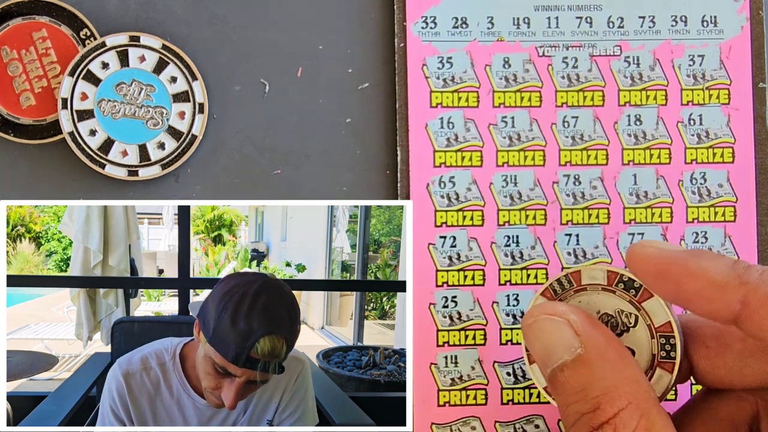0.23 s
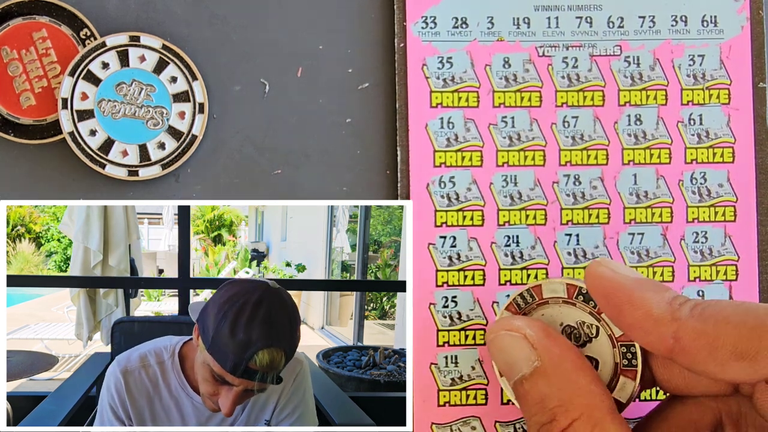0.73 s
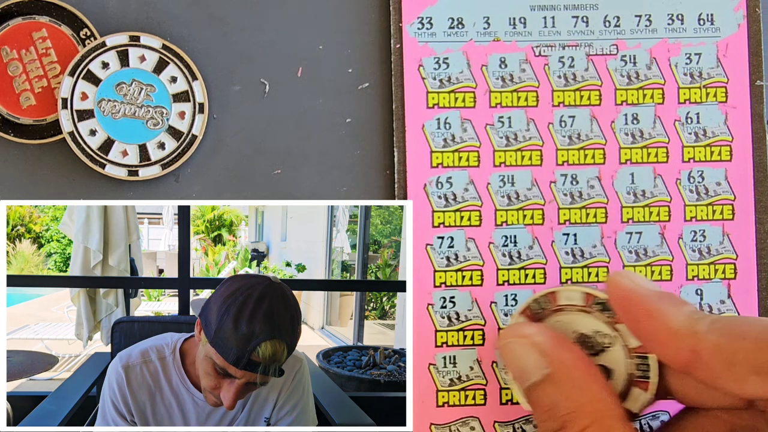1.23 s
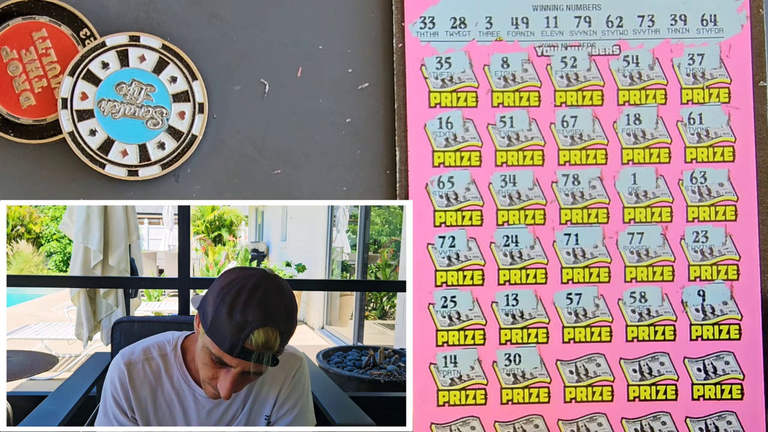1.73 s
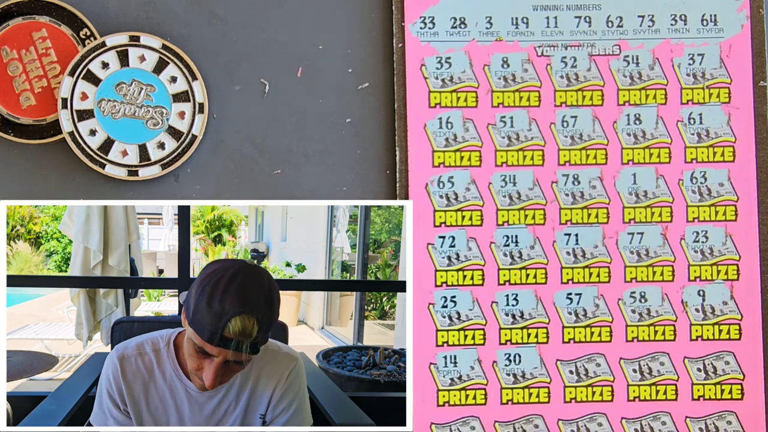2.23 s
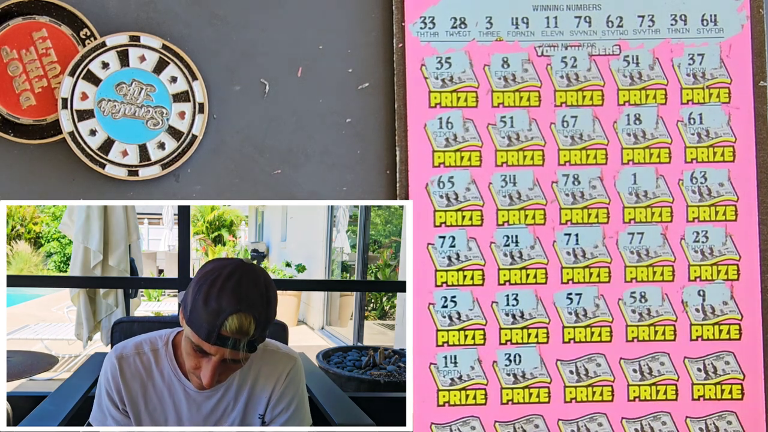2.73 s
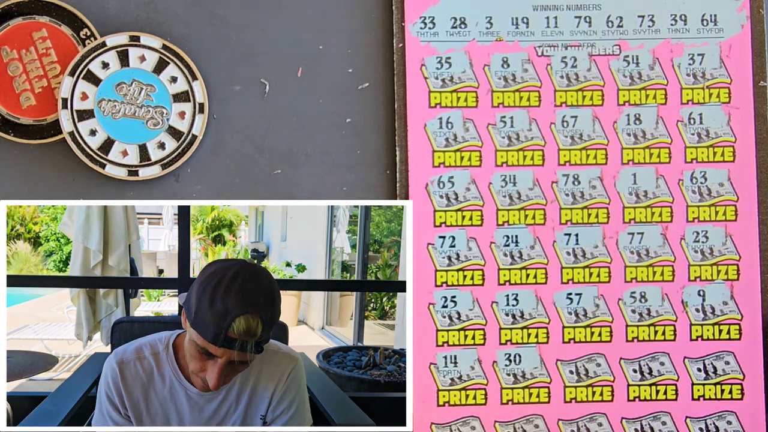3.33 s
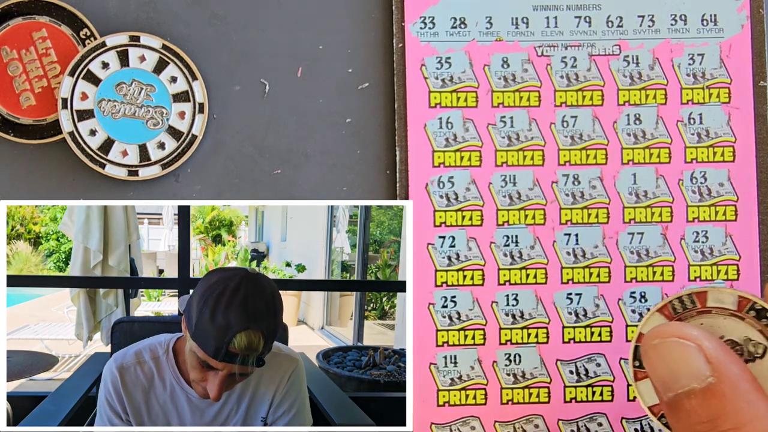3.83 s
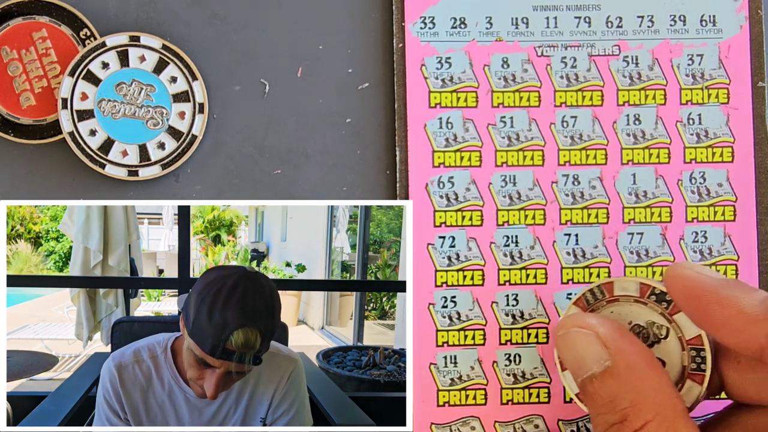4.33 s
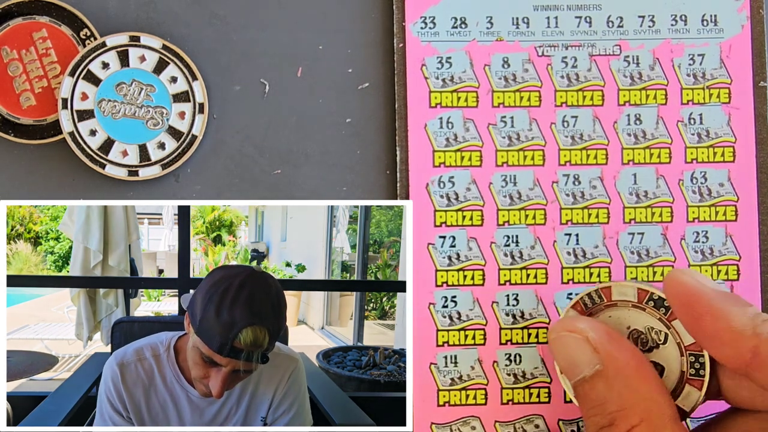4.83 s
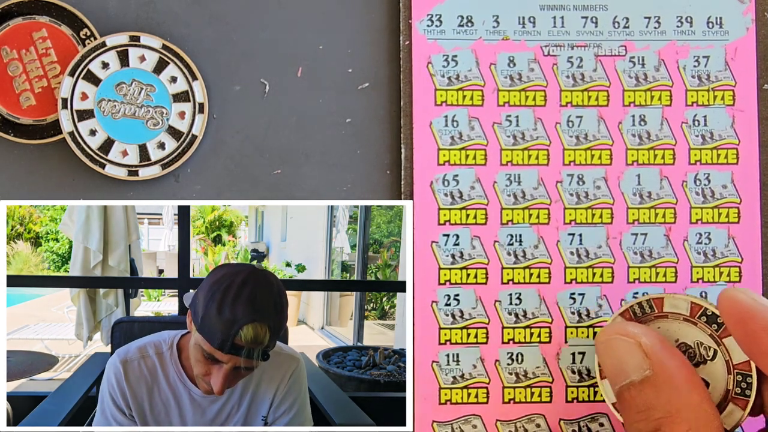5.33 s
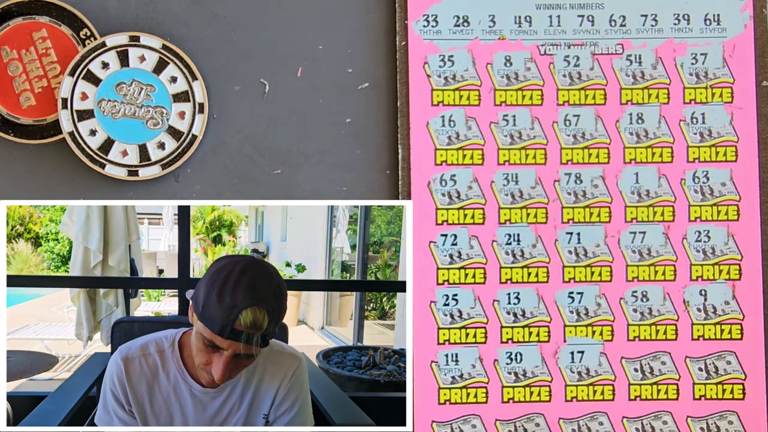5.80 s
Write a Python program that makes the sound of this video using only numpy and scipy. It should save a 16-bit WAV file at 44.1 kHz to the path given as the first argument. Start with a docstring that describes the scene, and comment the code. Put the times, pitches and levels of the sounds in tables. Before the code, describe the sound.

Short dry scratches of a coin rubbing a ticket on a table, with soft knocks, a quiet pause between bouts and faint insect buzz behind.

```python
"""Coin on a scratch ticket

A large coin scrapes latex off a ticket lying on a table, in two bouts of quick to-and-fro strokes.
Grains of tearing latex excite coin and card resonances and a broad hiss; filtered clicks make the knocks.
The rim squeaks hoarsely, snaps free in short cracks and judders against the table on the return strokes.
Behind it lie shaped-noise rumble, a faint sine hum and a high pulsing buzz like an insect in the garden."""
import sys
import numpy as np
from scipy import signal
from scipy.fft import rfft, irfft
from scipy.io import wavfile
from scipy.ndimage import uniform_filter1d

SR = 44100
rng = np.random.default_rng(int(sys.argv[2]) if len(sys.argv) > 2 else 0)


def dump_mix(stems):
    """Bounce the given channels to the path in sys.argv[1] as a 16-bit WAV at rate SR."""
    frames = np.atleast_2d(stems).T  # one column per channel
    limited = np.clip(frames, -1, 1)  # hard clip at full scale
    pcm = np.round(limited * 32767).astype(np.int16)
    wavfile.write(sys.argv[1], SR, pcm)


N = 267334
TIME = np.arange(N) / SR

# the coin's lowest tone, which sings along when it is held loosely, and its first overtone
RING_HZ, RING_WIDTH_HZ, RING_PAN_DB, OVERTONE_HZ = 1321, 22, 9, 1961
# still background spectrum: pitch_hz, relative_db (per Hz)
AIR_SPECTRUM = [(15, -10.5), (28, 1), (85, 0.5), (130, -5), (180, -13), (235, -11.5), (275, -17.5),
                (365, -24), (410, -21.5), (441, -27), (468, -22.5), (700, -28.5), (1150, -29.5),
                (1350, -30), (2050, -36), (2500, -42), (4000, -46.5), (6000, -57), (15000, -64.5)]
AIR_DB = -43.5
# stereo likeness of the background: pitch_hz, left_right_correlation (-1..1)
AIR_LIKENESS = [(60, 0.99), (130, 1), (290, 0.74), (640, 0.48), (1300, -0.25), (3000, 0.032),
                (15000, -0.049)]
# tones of the distant motor, before their wavering: pitch_hz, level_db
HUM_TONES = [(41, -56.5), (59.3, -54), (120, -67), (177, -70.5), (240, -57.5), (295, -70.5)]
# insect buzz spectrum: pitch_hz, relative_db (per Hz)
INSECT_SPECTRUM = [(5000, -25), (6500, -16.5), (7250, -0.5), (7900, -3.5), (8500, -4), (9400, -8),
                   (10100, -18), (13000, -43)]
# wander of the insect's beat and loudness: time_s, lateness_s, level_db
INSECT_COURSE = [(0, -0.0046, -71), (2, -0.013, -70.5), (2.5, -0.0022, -70), (3, -0.0048, -71),
                 (3.6, 0.014, -70.5), (4.2, .012, -68.5), (5.8, 0.0004, -70.5)]
CHIRPS_PER_S, FIRST_CHIRP_S, CHIRP_SQUARENESS = 8.185, .106, 1.1   # beat before its lateness is added
# two landings of the coin, and soft contacts as its rim bites or starts to judder:
# start_s, level_db, contact_hardness_hz (low-pass corner)
KNOCKS = [(0.536, -42.5, 695), (0.731, -25.5, 2340), (0.977, -51, 800), (1.196, -39, 800),
          (4.397, -25.5, 1700), (5.25, -47, 800), (5.415, -42, 800)]
# table under the ticket, and the coin's two lowest tones: pitch_hz, level_db, t60_s
TABLE_MODES = [(177, -19, .08), (346, -22, .13), (397, -19, .1), (610, -23, .035), (690, -13, .06),
               (1030, -25, .08), (RING_HZ, -21, .08), (1480, -18.5, .0065), (OVERTONE_HZ, -25, .035),
               (2700, -32, .022), (3680, -31, .012)]
# the blow spreads as a bending wave, highs ahead of lows
BEND_FROM_HZ, BEND_TO_HZ, BEND_GLIDE_S, BEND_LENGTH_S, BEND_DB = 1004, 218, 0.00051, 0.0039, 1
CARD_DAMPS_ABOVE_HZ = 2800   # the card cushions the blow and takes off its top
# the rim snaps against the card or an edge of latex: start_s, level_db, centre_hz, decay_s (to 1/e)
CATCHES = [(.7312, -48.5, 3000, .004), (.736, -49, 1900, .006), (1.108, -52.5, 1300, .008),
           (1.333, -46, 1500, .009), (1.496, -51, 6600, .01), (1.5308, -39.5, 3900, .0018),
           (1.5308, -43, 1550, .009), (4.398, -54, 3400, .002), (4.4025, -47, 1600, .004),
           (4.413, -47, 1200, .005), (4.737, -48, 7400, .004), (4.737, -49.5, 3900, .004)]
# the coin is pushed across the latex:
# middle_s, length_s, level_db, brightness_db, lean (-1..1), ring_db, squeak_hz, squeak_db
PUSHES = [(.862, 0.061, -61.5, -6.5, -0.37, 17.5, 4350, -67), (1.096, 0.047, -63.5, -2, -.5, 30, 4360, -82),
          (1.306, 0.037, -54, 0.5, -0.36, 21, 4300, -64), (1.509, 0.051, -57, -2, 0.29, 23, 3700, -65),
          (1.724, 0.037, -68.5, -4, 0, 12, 3150, -70), (4.495, 0.056, -55, -0.5, 0.28, 24.5, 3880, -65.5),
          (4.741, 0.043, -62, -2.5, .2, 28.5, 3820, -81), (4.936, 0.055, -61, 1.5, -0.42, 21, 3800, -83),
          (5.146, 0.046, -57, 2, -0.22, 18, 3700, -75), (5.353, 0.047, -55, 0.5, .6, 16, 3680, -70)]
# it is drawn back, and its rim judders: columns as in PUSHES, then judder_db, judder_hz
RETURNS = [(0.988, 0.025, -73, 0, 0, 12, 4400, -69, -53.5, 530),
           (1.217, 0.052, -61, 1.5, -0.027, 17, 4300, -69, -54.5, 503),
           (1.407, 0.037, -64, 0.5, -0.33, 21, 4500, -73, -53.5, 563),
           (1.6, 0.049, -64.5, -3.5, 0, 19, 3800, -87, -51.5, 540),
           (4.612, 0.07, -61, -2, 0, 6.3, 3530, -76, -61, 530),
           (4.831, 0.054, -58.5, 5, 0, 24, 3900, -75, -58.5, 620),
           (5.041, 0.053, -57, 3.5, 0.11, 16, 3740, -73, -55, 580),
           (5.26, 0.043, -69.5, -2, 0, 16, 3720, -90, -49.5, 504),
           (5.429, 0.016, -58.5, 1, -0.14, 29, 3780, -87, -52, 474)]
BITE_S = .0075   # how quickly the rim bites into the latex and leaves it
JUDDER_LEAD_S = 0.0017   # the judder sets in just before the latex tears
# coin and card resonances under the scrape:
# pitch_hz, width_hz, level_db, full_lean_change_db, left_over_right_db
SCRAPE_MODES = [(OVERTONE_HZ, 28, 9.5, 0, 2), (2750, 200, 1, -10, 16), (3500, 79, 4.3, 4.9, 2),
                (3690, 140, 4.8, 4.5, 5.1), (4433, 190, 11, -3.5, 7), (5568, 57, 2, 1, 3.6),
                (6420, 283, 7.5, -1, 1.5), (7400, 174, 5.7, 3.8, 6), (8400, 449, -8, -4, 0),
                (9294, 600, -3, 0, -9), (11600, 350, 0.5, -2, 3)]
# broad hiss of the tearing latex: pitch_hz, relative_db (per Hz)
LATEX_SPECTRUM = [(200, -46), (600, 11), (1300, -0.5), (2300, -5), (3000, -3.5), (4200, -0.5), (5200, -4),
                  (7500, 2), (9500, -5.5), (10400, -14), (11500, -7), (12200, -20), (15000, -14)]
# soft rustles of the hand: start_s, end_s, level_db, centre_hz
RUSTLES = [(1.708, 1.75, -61, 2010), (2.338, 2.395, -65, 2520), (2.39, 2.50, -74.5, 2840),
           (5.52, 5.64, -74, 2750), (5.74, 5.79, -74, 13000)]
RIGHT_LAG_SAMPLES = 24   # delay from the nearer to the farther microphone
ROOM_T60_S = .2
CUTOFF_HZ = 15300


def from_db(db):
    """Turn decibels into an amplitude gain."""
    return 10 ** (np.asarray(db) / 20)


def rms_one(x):
    """Scale a sound to rms 1."""
    return x / np.sqrt(np.mean(x ** 2) + 1e-20)


def at_hz(points, hz):
    """Read a table along a log-frequency axis."""
    table_hz, value = np.transpose(points)
    return np.interp(np.log(hz + 1e-3), np.log(table_hz), value)


def colour(x, spectrum):
    """Shape a steady sound with a spectrum; rms 1."""
    gain = from_db(at_hz(spectrum, np.fft.rfftfreq(N, 1 / SR)))
    return rms_one(irfft(rfft(x) * gain, N))


def butter(x, hz, kind, order=2):
    """Apply a causal Butterworth filter."""
    sos = signal.butter(order, np.clip(hz, 10, .45 * SR), kind, fs=SR, output="sos")
    return signal.sosfilt(sos, x + 1e-18)


def drift(rate):
    """Wander randomly, with this many new values a second; rms 1."""
    knots = rng.standard_normal(4000)
    return rms_one(np.interp(TIME * rate, np.arange(len(knots)), knots))


def resonate(x, hz, width_hz):
    """Pass a sound through a resonance with gain 1 at its peak."""
    r = np.exp(-np.pi * width_hz / SR)
    feed = np.array([1, 0, -1]) * (1 - r * r) / 2
    return signal.lfilter(feed, [1, -2 * r * np.cos(2 * np.pi * hz / SR), r * r], x + 1e-18)


def ring(clicks, hz, t60):
    """Let each unit click set a sine of starting height 1 ringing down."""
    r = from_db(-60 / (t60 * SR))
    w = 2 * np.pi * hz / SR
    return signal.lfilter([0, np.sin(w)], [1, -2 * r * np.cos(w), r * r], clicks + 1e-18)


def swell(start, end, edge_s):
    """Follow the hand as it speeds up, slides and slows down again."""
    speeding_up = (1 + np.tanh((TIME - start) / edge_s)) / 2
    slowing_down = (1 + np.tanh((end - TIME) / edge_s)) / 2
    return speeding_up * slowing_down


def grains(per_s, spread_db):
    """Scatter random tiny fractures of uneven size; rms 1."""
    sizes = from_db(spread_db * np.clip(rng.standard_normal(N), -2, 2))
    signed = sizes * rng.choice([-1, 1], N)
    return rms_one(signed * (rng.random(N) < per_s / SR))


def background(waver_db=2.0, wander_rad=0.15):
    """Low rumble and air from shaped noise, with the wavering sine hum of a distant motor."""
    alike = np.clip(at_hz(AIR_LIKENESS, np.fft.rfftfreq(N, 1 / SR)), -1, 1)
    mid, side = rfft(rng.standard_normal((2, N)))
    stereo = np.sqrt(1 + alike) * mid + np.sqrt(1 - alike) * side * [[1], [-1]]
    air = colour(irfft(stereo, N), AIR_SPECTRUM)
    hum = 0
    for hz, db in HUM_TONES:
        tone = rms_one(np.sin(2 * np.pi * hz * TIME + wander_rad * drift(6.2)))
        hum = hum + from_db(db + waver_db * drift(17)) * tone
    return from_db(AIR_DB) * air + hum


def insect(pause_db=-8.0, waver_db=1.0, rasp_db=0.8):
    """A far noise rasp pulses at a nearly steady rate and slowly swells and fades, its chirps uneven."""
    s, *columns = np.transpose(INSECT_COURSE)
    late, db = (np.interp(TIME, s, column) for column in columns)
    beat = np.cos(2 * np.pi * CHIRPS_PER_S * (TIME - FIRST_CHIRP_S - late))
    closed = (1 - np.tanh(CHIRP_SQUARENESS * beat)) / 2
    level = from_db(db + pause_db * closed + waver_db * drift(9.7) + rasp_db * drift(300))
    return level * colour(rng.standard_normal((2, N)), INSECT_SPECTRUM)


def knocks(rattle_db=-25, rattle_s=0.013, rattle_thump_db=-7):
    """Each landing or soft contact thumps, rings the table and lets the rim rattle for a moment."""
    blow = rattle = 0
    for s, db, hard_hz in KNOCKS:
        click = signal.unit_impulse(N, round(s * SR))
        blow = blow + from_db(db) * butter(click, hard_hz, "low")
        settling = (TIME > s + .003) * np.exp(-np.abs(TIME - s) / rattle_s)
        ticks = butter(settling * grains(per_s=720, spread_db=5.0), hard_hz, "low")
        rattle = rattle + from_db(db + rattle_db) * ticks
    t = TIME[:SR // 20]
    bend_hz = BEND_TO_HZ + (BEND_FROM_HZ - BEND_TO_HZ) * np.exp(-t / BEND_GLIDE_S)
    bend = -np.sin(2 * np.pi * np.cumsum(bend_hz) / SR) * np.exp(-(t / BEND_LENGTH_S) ** 4)
    thump_drive = blow + from_db(rattle_thump_db) * rattle
    thump = from_db(BEND_DB) * signal.fftconvolve(thump_drive, bend)[:N]
    body = 0
    for k, (hz, db, t60) in enumerate(TABLE_MODES):
        # successive modes start in opposite directions
        body = body + (-1) ** k * from_db(db) * ring(blow + rattle, hz, t60)
    return butter(thump + body, CARD_DAMPS_ABOVE_HZ, "low", order=3)


def catches():
    """The rim snaps free with a short decaying noise crack, about an octave wide."""
    out = np.zeros((2, N))
    for s, db, hz, decay_s in CATCHES:
        after = (TIME >= s) & (TIME < s + .1)
        noise = rng.standard_normal((2, after.sum()))
        crack = rms_one(butter(noise, [hz / 1.4, hz * 1.4], "band", order=4))
        out[:, after] += from_db(db) * crack * np.exp((s - TIME[after]) / decay_s)
    return out


def strokes():
    """List all strokes in time order: start_s, end_s, level_db, brightness_db, lean, ring_db."""
    return sorted((s - length / 2, s + length / 2, db, bright, lean, ring_db)
                  for s, length, db, bright, lean, ring_db, *_ in PUSHES + RETURNS)


def rubbing(level_db=-7, edge_s=0.03, low_hz=950, high_hz=2600, count=2):
    """Gritty friction on the card sets in before the latex tears and outlasts it."""
    pressure = sum(from_db(db - bright) * swell(a, b, edge_s) for a, b, db, bright, *_ in strokes())
    crumbs = np.array([grains(per_s=900, spread_db=3.5) for _ in range(count)])
    return from_db(level_db) * pressure * rms_one(butter(crumbs, [low_hz, high_hz], "band"))


def squeaks(width_hz=380, octave_db=-6, edge_s=0.021, pan_db=4):
    """The rim chatters in a hoarse squeak with its octave, at a pitch set for each stroke."""
    out = np.zeros(N)
    slips = grains(per_s=3300, spread_db=1.5)
    for s, length, _, _, _, _, hz, db, *_ in PUSHES + RETURNS:
        near = np.abs(TIME - s) < .1
        voices = []
        for k in (1, 2):
            once = resonate(slips[near], k * hz, k * width_hz)
            voices.append(rms_one(resonate(once, k * hz, k * width_hz)))
        low, high = voices
        slide = swell(s - length / 2, s + length / 2, edge_s)[near]
        out[near] += from_db(db) * slide * (low + from_db(octave_db) * high)
    return np.array([out, np.roll(out, RIGHT_LAG_SAMPLES)]) * from_db([[pan_db / 2], [-pan_db / 2]])


def per_stroke(values):
    """Hold one value through each stroke and glide between them."""
    return np.interp(TIME, np.ravel([row[:2] for row in strokes()]), np.repeat(values, 2))


def tearing(flake_db=-7, flutter_db=0.5, arch_db=-5.0, split_hz=4000, count=3):
    """Latex breaks in dense grains at several points of the sliding rim, each stroke with its brightness."""
    low = high = 0
    for a, b, db, bright, *_ in strokes():
        off_centre = np.clip((2 * TIME - a - b) / (b - a), -1, 1)   # the hand is fastest in mid-stroke
        effort = swell(a, b, BITE_S) * from_db(db + arch_db * off_centre ** 2)
        low = low + effort * from_db(-bright)
        high = high + effort * from_db(bright)
    grit = np.array([grains(per_s=4200, spread_db=5.5) for _ in range(count)])
    # the coating gives way unevenly, for the whole rim at once
    grit = grit * from_db(flutter_db * drift(220))
    # larger flakes tick off one by one
    grit = grit + from_db(flake_db) * grains(per_s=320, spread_db=3)
    dull = butter(grit, split_hz, "low", order=1)
    return low * dull + high * (grit - dull)


def scrape(hiss_db=-1, roll_db=2.3, top_hz=12000):
    """The tearing rings coin and card, and hisses from points along the rim."""
    force, *rim = tearing()
    *_, lean, ring_db = np.transpose(strokes())
    lean = per_stroke(lean)
    sing = resonate(force * from_db(per_stroke(ring_db)), RING_HZ, RING_WIDTH_HZ)
    body = sing * from_db([[RING_PAN_DB / 2], [-RING_PAN_DB / 2]])
    for hz, width, db, lean_db, pan in SCRAPE_MODES:
        # the lean sets the point of contact, and with it each mode's share; the rim also rolls a little
        share = from_db(db + lean_db * lean + roll_db * drift(60))
        mode = resonate(force * share, hz, width)
        body = body + mode * from_db([[pan / 2], [-pan / 2]])
    body = butter(body, top_hz, "low")
    body[1] = np.roll(body[1], RIGHT_LAG_SAMPLES)
    hiss = np.std(force) * colour(np.array(rim), LATEX_SPECTRUM)
    return body + from_db(hiss_db) * hiss


def judder(width_hz=150, attack_s=0.0037, release_s=0.008, floor_hz=330):
    """On each return, the rim sticks and slips abruptly and drums on the table, pitched by the grip."""
    out = 0
    for s, length, *_, db, hz in RETURNS:
        drumming = resonate(grains(per_s=1200, spread_db=0.5), hz, width_hz)
        slips = rms_one(butter(drumming, [floor_hz, hz * 1.28], "band"))
        slips /= np.sqrt(uniform_filter1d(slips ** 2, size=700) + 1e-3)   # the hand keeps the pressure even
        grip = (1 + np.tanh((TIME - s + length / 2 + JUDDER_LEAD_S) / attack_s)) / 2
        let_go = (1 + np.tanh((s + length / 2 - TIME) / release_s)) / 2
        out = out + slips * from_db(db) * grip * let_go
    return out


def rustles(edge_s=0.016, uneven_db=2):
    """Light, uneven brushing of band-passed noise as the hand moves off and waits."""
    out = 0
    for a, b, db, hz in RUSTLES:
        brush = rms_one(butter(rng.standard_normal((2, N)), [hz / 1.25, hz * 1.25], "band"))
        out = out + from_db(db) * swell(a, b, edge_s) * brush
    return out * from_db(uneven_db * drift(70))


def reflections(x, t60, gap_s):
    """Dying scatter, alike on both sides in the bass and different in the treble."""
    t = np.arange(SR // 2) / SR
    mid, side = rng.standard_normal((2, len(t))) * from_db(-60 * t / t60) * (t > gap_s)
    side = butter(side, 420, "high", order=1)
    response = np.array([mid + side, mid - side])
    response /= np.sqrt(np.sum(response ** 2, axis=1, keepdims=True))
    return signal.fftconvolve(x * np.ones((2, 1)), response, axes=1)[:, :N]


def scene(near_db=-11, room_db=-14, knock_pan_db=1.5):
    """Place the coin close by, with scatter from the table top and a little room."""
    contacts = knocks() * from_db([[knock_pan_db], [-knock_pan_db]])
    coin = contacts + catches() + rubbing() + squeaks() + scrape() + judder()
    near = from_db(near_db) * reflections(coin, t60=.07, gap_s=.003)
    room = from_db(room_db) * reflections(coin, t60=ROOM_T60_S, gap_s=0.012)
    return background() + insect() + coin + near + room + rustles()


def record(dry):
    """Cut the top steeply with an elliptic low-pass."""
    return signal.sosfilt(signal.ellip(14, .1, 80, CUTOFF_HZ, fs=SR, output="sos"), dry)


dry = scene()
out = record(dry)
dump_mix(out)
```